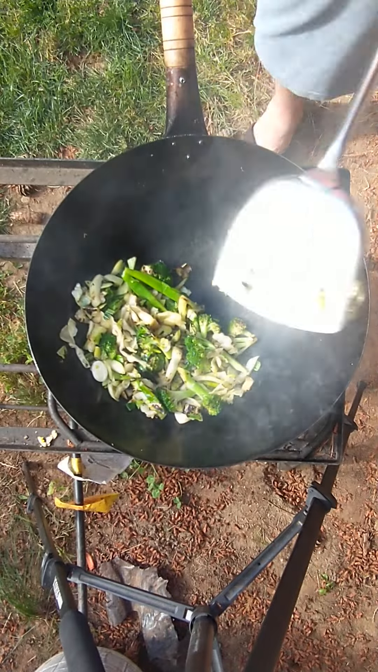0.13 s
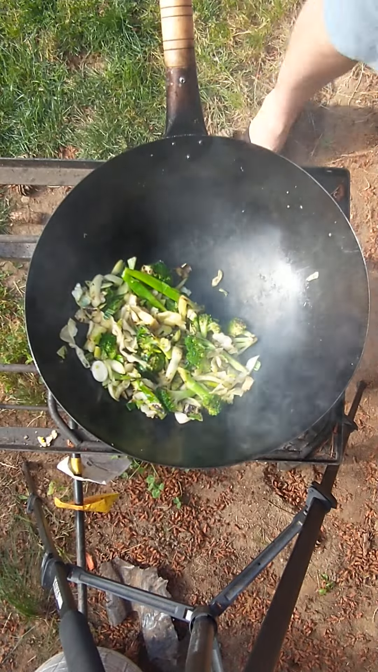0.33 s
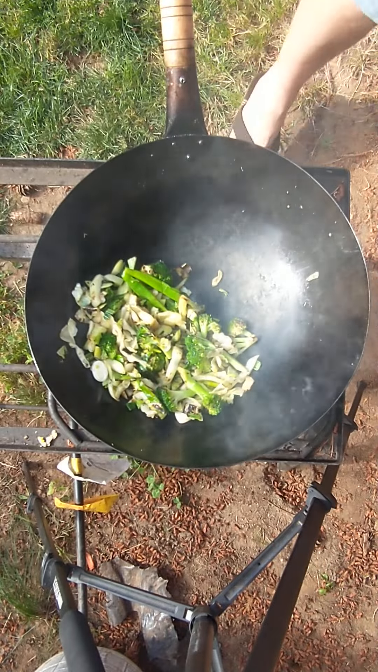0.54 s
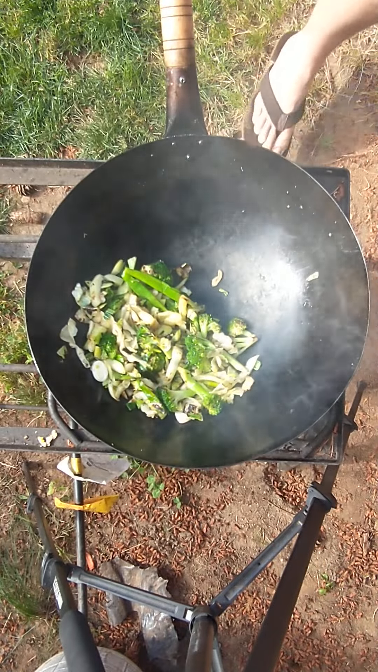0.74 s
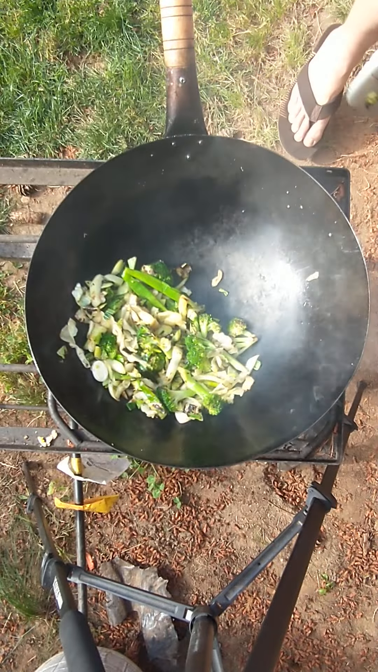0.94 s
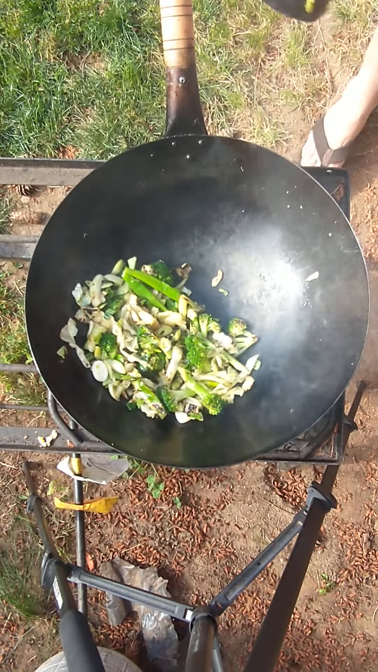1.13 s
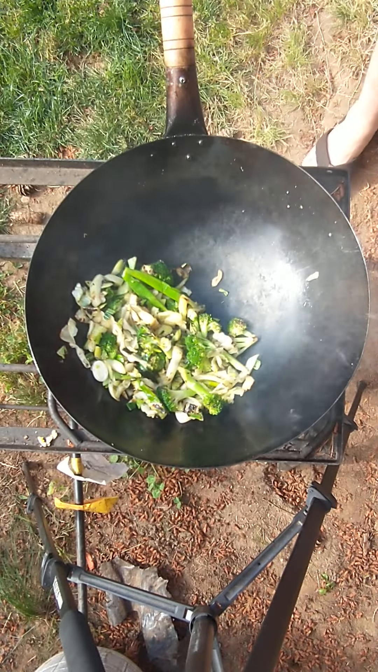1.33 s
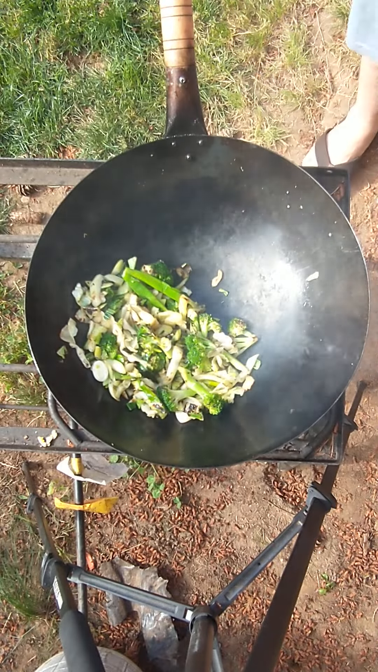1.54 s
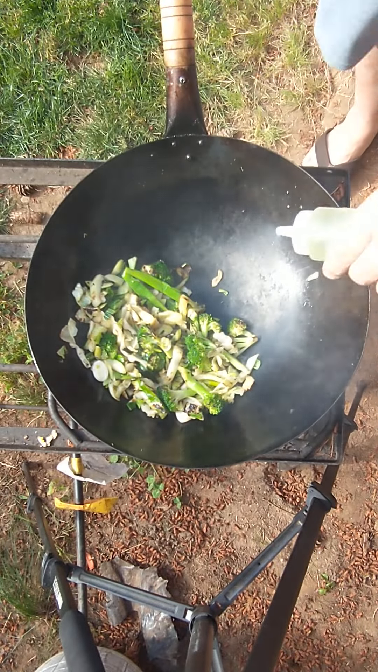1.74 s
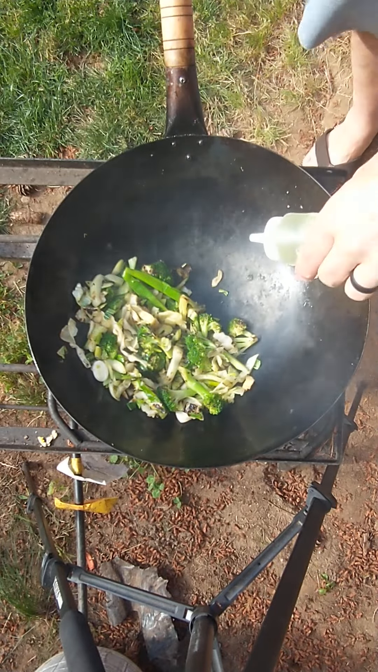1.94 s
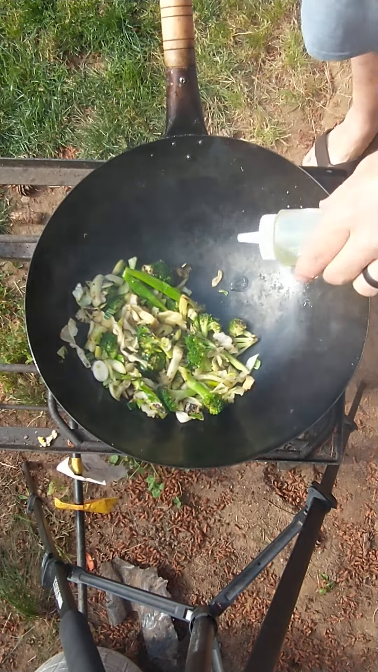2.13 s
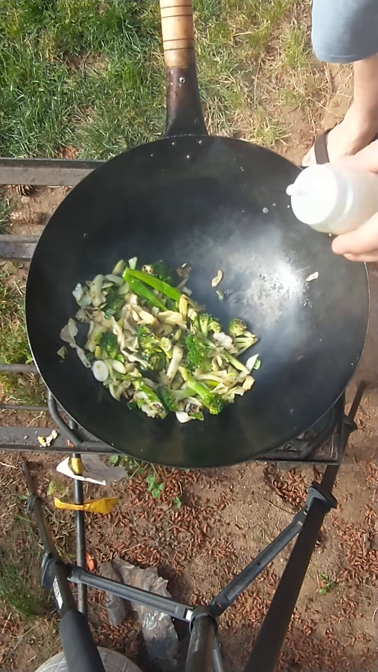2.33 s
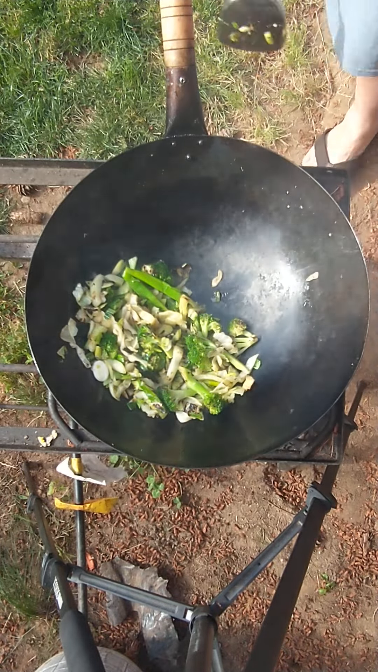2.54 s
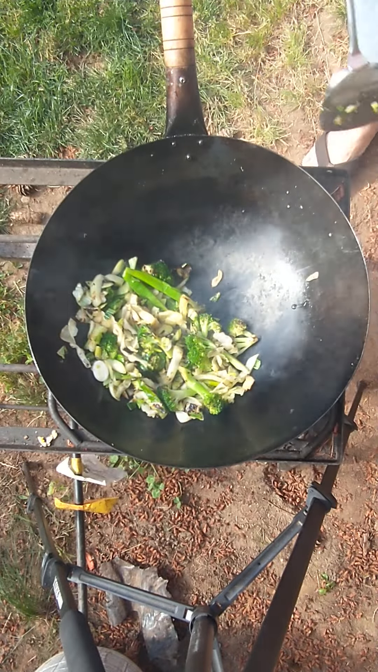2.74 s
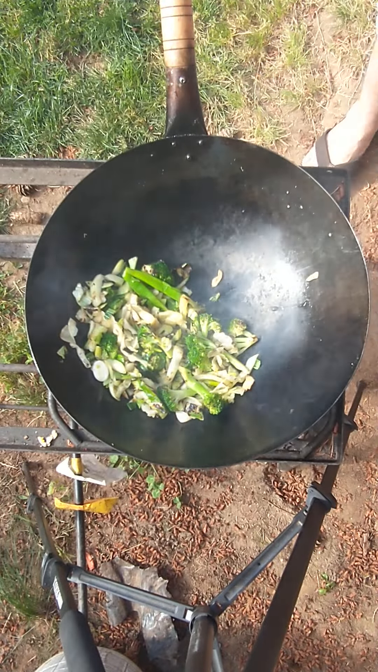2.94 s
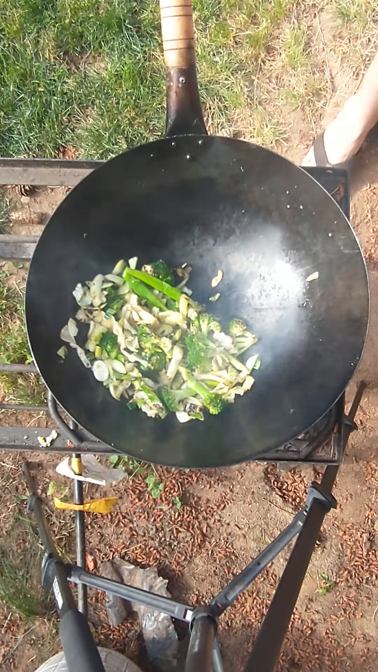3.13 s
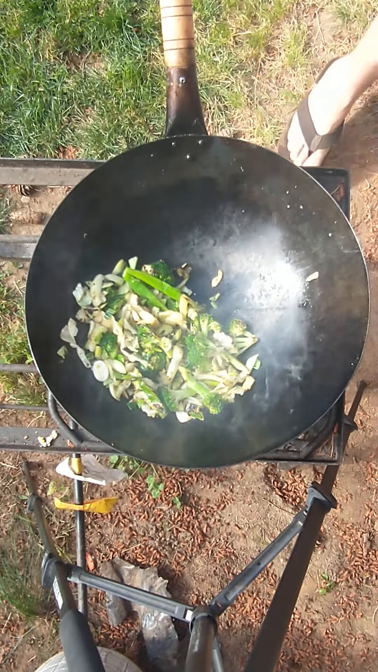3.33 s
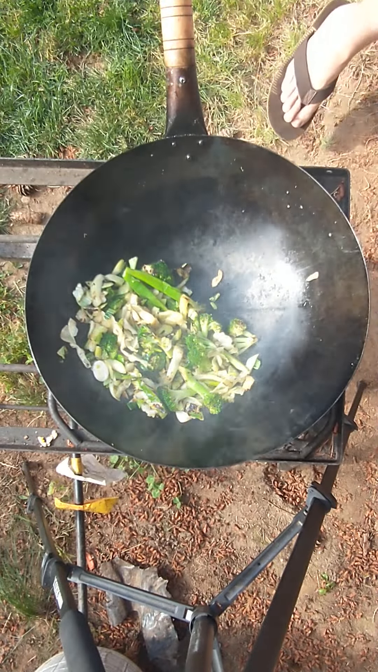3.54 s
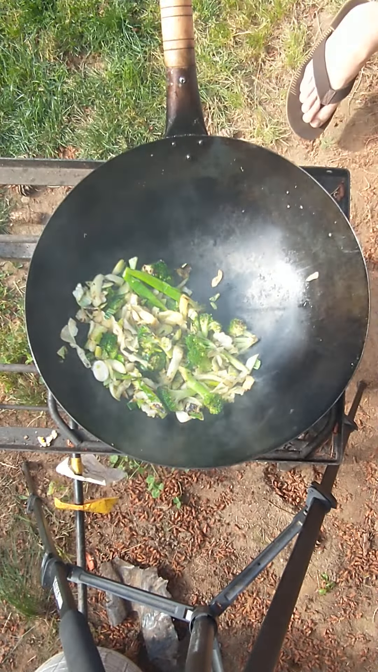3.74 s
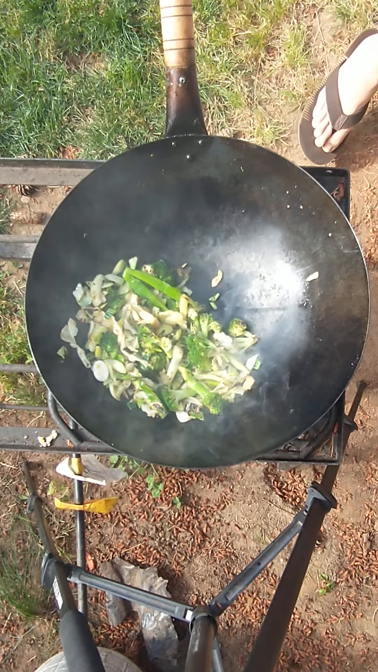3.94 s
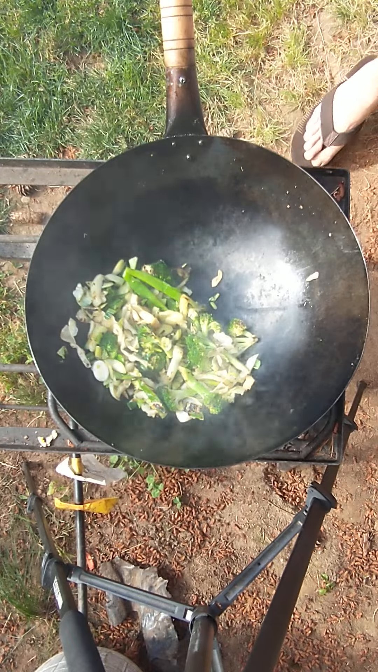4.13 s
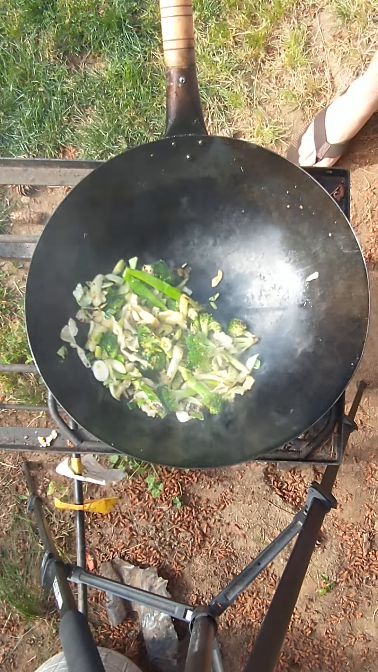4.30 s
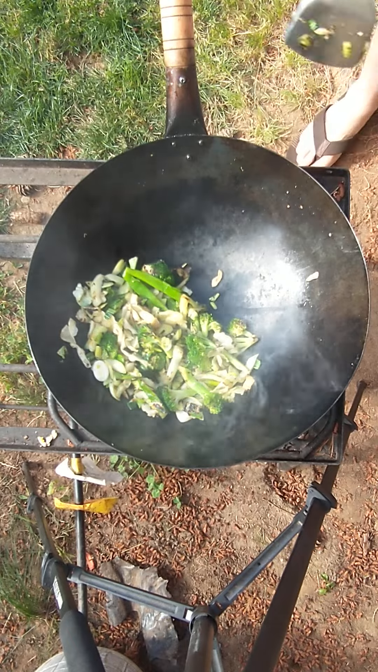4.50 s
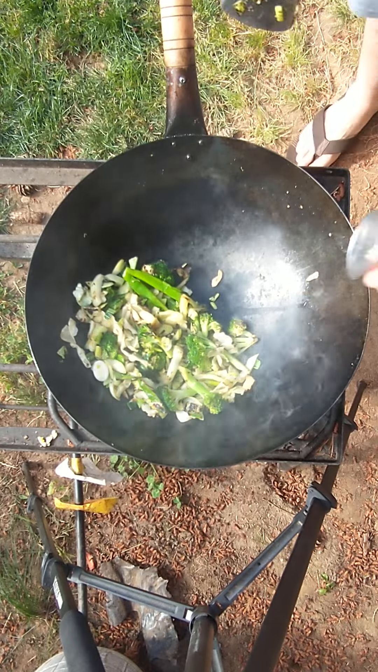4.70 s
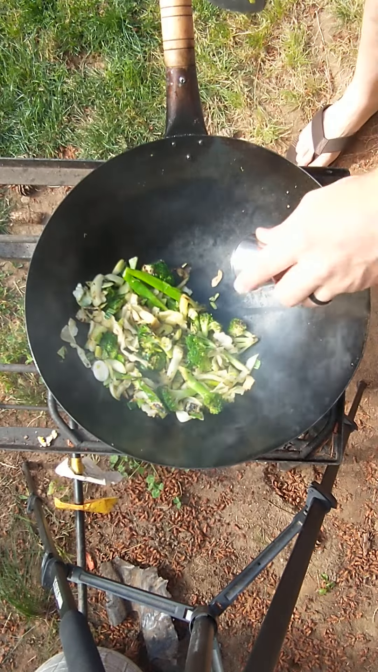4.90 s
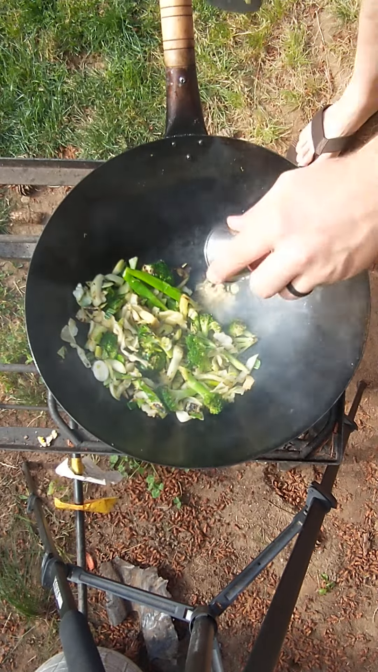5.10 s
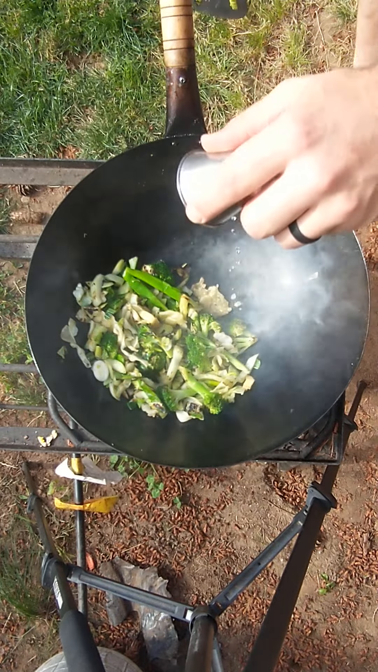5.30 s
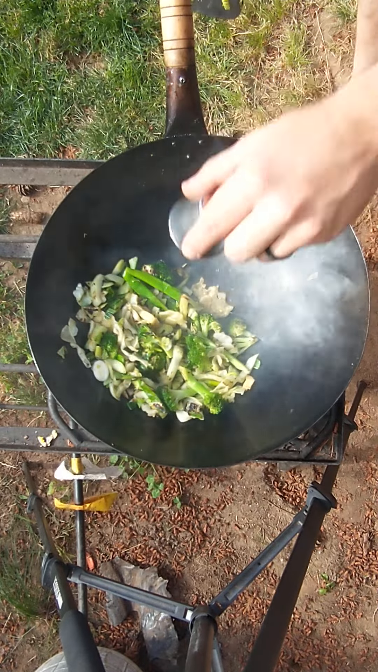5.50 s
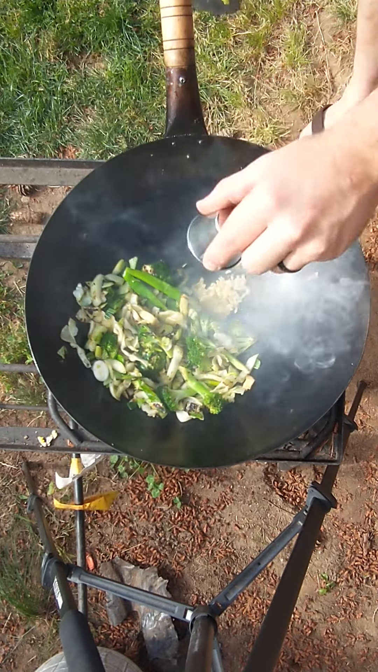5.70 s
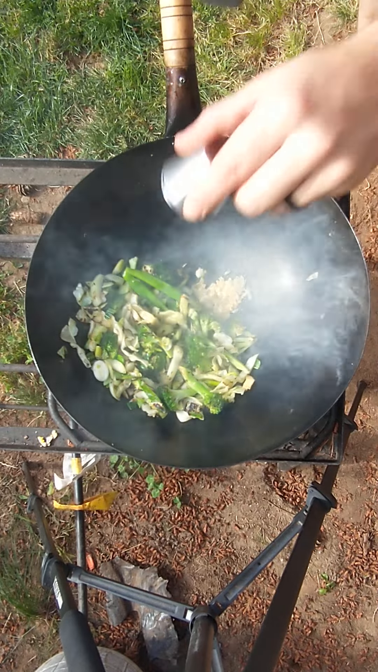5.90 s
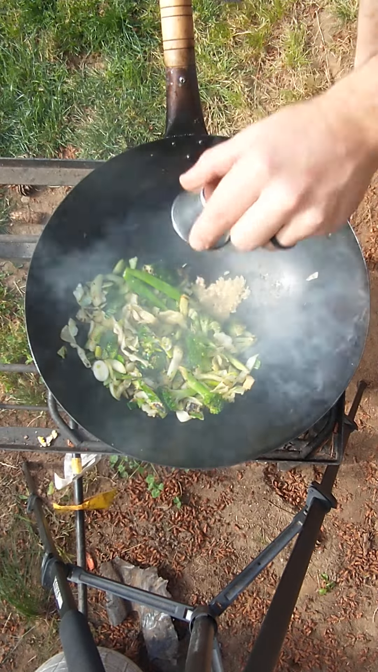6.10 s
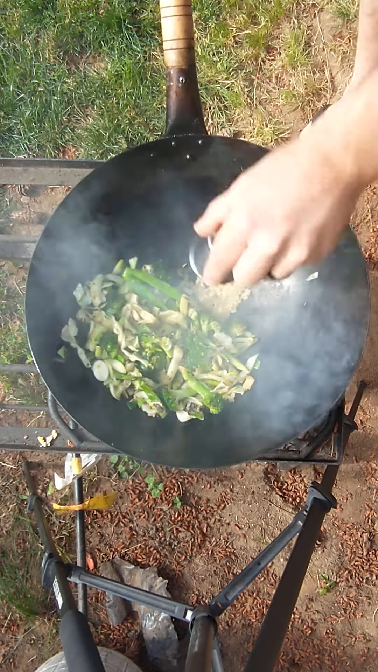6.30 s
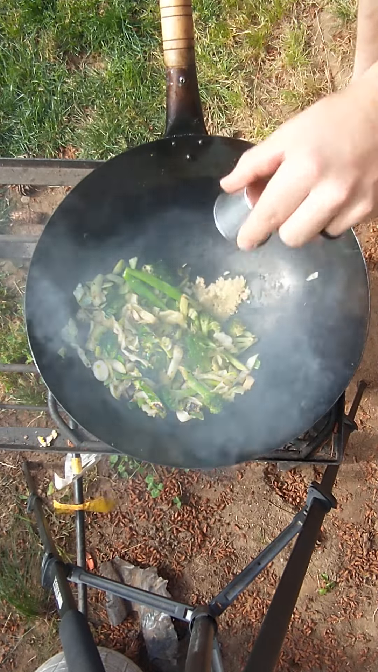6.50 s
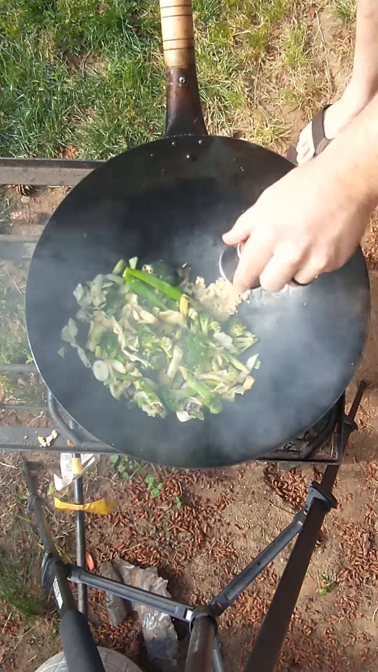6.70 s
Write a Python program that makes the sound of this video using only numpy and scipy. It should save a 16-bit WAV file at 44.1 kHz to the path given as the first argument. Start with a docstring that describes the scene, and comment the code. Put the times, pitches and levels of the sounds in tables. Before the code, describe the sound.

Greens sizzle and spit in a hot outdoor wok, thinning to a sparse sputter before minced garlic hits the oil with a loud dense hiss.

```python
"""Greens and garlic in a wok

Greens and mushrooms sizzle, spit and dry down in a wok outdoors, heard from just above the pan.
Then minced garlic drops into the hot oil and swells to a loud, dense hiss. Both are many tiny bubble bursts.
Juice fizzes in decaying bursts; spits and ticks are short cracks with a lower ring or knock behind.
A sandal on dirt (thud and grit), a faint hollow rubbing and a burner's rumble are mostly shaped noise."""
import sys
import numpy as np
from scipy import signal
from scipy.fft import rfft, irfft, next_fast_len
from scipy.io import wavfile

SR = 44100
rng = np.random.default_rng(int(sys.argv[2]) if len(sys.argv) > 2 else 0)


def file_out(sig):
    """Save sig as 16-bit WAV at sys.argv[1]."""
    # one column per channel
    cols = np.atleast_2d(sig).T
    # limit, then scale
    lim = np.clip(cols, -1, 1)
    pcm = np.round(lim * 32767).astype(np.int16)
    wavfile.write(sys.argv[1], SR, pcm)


N = 297675
TIME = np.arange(N) / SR  # seconds

# Every colour table gives only the shape of a tone; its overall level is set elsewhere.
# How hard the vegetables sizzle, before thinning and sputter: [t/s, level/dB]
GREENS_LEVEL = [(0.0, -37.5), (0.75, -37.5), (1.2, -39), (1.46, -38), (2.12, -42), (2.25, -39.5),
                (2.37, -41.5), (2.5, -39), (2.66, -41.5), (2.79, -45.5), (2.99, -46.5), (3.12, -46),
                (3.5, -47), (3.82, -51), (4.03, -48.5), (4.48, -50), (4.8, -47), (5.05, -46)]
# Colour of the vegetables while juicy: [f/Hz, level/dB]
JUICY_COLOUR = [(300, -28.5), (1200, -45), (1780, -24.5), (2000, -7), (2600, -5), (3950, 1), (4350, -3),
                (5500, -7), (6750, -2.5), (7700, -1.9), (9500, -2.5), (11000, -7.5), (13700, -10.5),
                (15300, -8)]
# Colour of the vegetables once drier: [f/Hz, level/dB]
DRIER_COLOUR = [(300, -39), (1200, -26.5), (1780, -28), (2000, -10), (2600, -8), (3950, -4), (4350, -8),
                (5500, -11.5), (6750, -3.5), (7700, -4.5), (9500, -6), (11000, -11.5), (13700, -15),
                (15300, -15)]
# Colour of the oil crackle: [f/Hz, level/dB]
CRACKLE_COLOUR = [(1500, -44), (4000, -14), (7000, -4), (10500, -3), (15500, -7)]
# Colour of the garlic: [f/Hz, level/dB]
GARLIC_COLOUR = [(100, -33.5), (450, -27.5), (1000, -18), (1550, -9.5), (2300, -12.5), (3150, -8.5),
                 (3500, -14), (4050, -6.5), (5100, -8.5), (6800, 0), (7600, -4.5), (9700, -3.5),
                 (10800, -10.5), (11900, -7.5), (13900, -11), (15500, -7.5)]
# The hiss surges as more wet garlic reaches the oil: [t/s, hold from t/s, gain/dB]
SURGES = [(5.272, 0.028, 0.5), (5.485, 0.15, 2), (5.768, .04, 4.5), (5.933, 0.18, 3.5), (6.14, 0.27, 3)]
# Juice flashes off hot metal: [t/s, starting level/dB, centre f/Hz, width/octaves, time to fall 60 dB/s]
FLARES = [(2.402, -36.5, 6200, 0.62, 0.1), (2.403, -44.5, 3840, 0.21, 1), (3.93, -53.5, 9000, 0.71, 0.44),
          (4.285, -51, 7840, 0.31, .4), (4.575, -40.5, 7950, 0.24, 0.15), (5.067, -34, 7750, 0.91, .1)]
# Loudest single spits and ticks: [t/s, crack level/dB, ring re crack/dB, low knock re crack/dB]
SPITS_AND_TICKS = [(0.101, -30, -5, -26), (0.402, -35.5, -13, -34), (0.584, -34, -14, -34),
                   (1.9982, -32.5, -11, -50), (2.5052, -36, -22, -38), (2.739, -34.5, -12, -33),
                   (2.8771, -37.5, -3.5, -14), (3.1592, -43, -10.5, -10), (3.3637, -44, -8.5, -3),
                   (3.4547, -39, -12, -14.5), (5.211, -29.5, -19, -34), (5.298, -23.5, -14, -39),
                   (5.308, -27, -20, -32)]
# Sandal on dirt: [t/s, level/dB, rise/s, time until it fades/s, time to fall 60 dB/s]
STEPS = [(0.0, -61, 0.0092, 0.12, .2), (2.919, -62, .002, 0.0065, 0.042), (3.423, -45, 0.0015, 0.035, 0.18),
         (4.840, -61.5, 0.051, 0.094, .2)]
# Colour of a step: [f/Hz, level/dB]
STEP_COLOUR = [(40, -24), (90, -3), (145, 6.5), (230, -7), (420, 1.5), (720, -4), (1000, -8), (1400, -4.5),
               (2700, -14.5), (4500, -21), (9000, -52)]
# Strength of the hollow rubbing: [t/s, level/dB]
RUB_LEVEL = [(3.98, -88), (4.06, -72), (4.12, -62), (4.15, -63), (4.19, -77.5), (4.29, -66), (4.40, -73),
             (4.48, -82)]
# Resonances of the rubbing: [f/Hz, width/Hz, level/dB]
RUB_MODES = [(300, 38, -5), (554, 58, -0.5), (707, 63, -4), (820, 60, -6)]
# Colour of the burner's low rumble: [f/Hz, level/dB]
BURNER_COLOUR = [(15, -65), (25, -43), (43, -15), (70, -7), (90, -3.5), (102, 3.5), (136, -7), (253, -9.5),
                 (295, -9.5), (368, -12), (408, -13.5), (460, -10), (718, -12.5), (1290, -15), (1500, -11),
                 (1950, -13.5), (3300, -120)]
# Strength of the rumble before its fixed boost: [t/s, level/dB]
BURNER_LEVEL = [(0.0, -61), (0.3, -65), (0.85, -61.5), (1.7, -66.5), (4.7, -68.5), (5.55, -61), (6.75, -64)]
# Left microphone port against the right: [f/Hz, level difference/dB]
PORT_BALANCE = [(200, -0.7), (1600, -2.5), (2600, 7.1), (3300, 4.3), (4000, 3.2), (4600, -4.2),
                (5200, -8.7), (6000, -1.5), (6800, 3.4), (7700, 1), (10200, -1.4), (10800, -8.0),
                (13600, -8.2), (14700, -2.5)]
# How alike the two ports are: [f/Hz, likeness from 0 to 1]
PORT_LIKENESS = [(200, 1), (1900, 0.87), (2650, 0.24), (3500, 0.35), (4300, 0.2), (5500, 0.27),
                 (7000, 0.39), (9500, 0.11), (15000, 0.19)]


def greens(drier_s=1.73, change_s=0.2, thinning=0.52):
    """Juice boils off under the vegetables; sparse, sharp oil crackles stand out as the boil fades."""
    s, db = np.transpose(GREENS_LEVEL)
    level_db = np.interp(TIME, s, db)
    sunk_db = db.max() - level_db
    activity = gain_of(-thinning * sunk_db)  # a quieter pan has fewer bubbles
    boil = bubbles(per_s=11000 * activity, spread_db=3.0, largest=4.9, flutter_db=0.65)
    dryness = np.clip((TIME - drier_s) / change_s + 0.5, 0, 1)
    juicy_boil = (1 - dryness) * coloured(boil, JUICY_COLOUR)
    drier_boil = dryness * coloured(boil, DRIER_COLOUR)

    crackle = bubbles(per_s=100, spread_db=3.5, largest=3.2, flutter_db=1.2)
    crackle_gain = gain_of(-14 + 0.11 * sunk_db)
    sizzle = juicy_boil + drier_boil + crackle_gain * coloured(crackle, CRACKLE_COLOUR)

    # the thinner the sizzle, the more it sputters
    sputter_db = 0.47 + 0.032 * sunk_db
    middle_db = level_db + sputter_db * flutter(3.3, 15)
    large_db = middle_db - 9 - 0.031 * sunk_db
    fine_db = middle_db - 8 + 0.33 * sunk_db
    return played(sizzle, [large_db, middle_db, fine_db], edges_hz=(5700, 10800))


def garlic(lands_s=5.066, heats_s=5.135, hot_s=5.267, landing_db=-39, hot_db=-28.5):
    """Wet garlic meets hot oil: dense bubbles merge into a hiss, and grow larger as it cooks."""
    hiss = bubbles(per_s=30000, spread_db=2.9, largest=5.5, flutter_db=0.3)
    hiss = coloured(hiss, GARLIC_COLOUR)
    heat_db = np.interp(TIME, [heats_s, hot_s], [landing_db, hot_db])
    surge_db = surges()
    cooked_s = TIME - lands_s
    # each size: level against the main hiss (dB), growth (dB per s), share of each surge
    large_db = heat_db - 17 + 4.9 * cooked_s + 0.29 * surge_db
    middle_db = heat_db - 8.5 + 1.64 * cooked_s + 0.59 * surge_db
    main_db = heat_db + surge_db
    fine_db = heat_db - 3 + 0.32 * cooked_s + 0.47 * surge_db
    levels_db = [large_db, middle_db, main_db, fine_db]
    return played(hiss, levels_db, edges_hz=(3600, 5700, 10800)) * (TIME > lands_s)


def surges(rise_s=0.015, fall_s=0.038):
    """More wet garlic lifts the hiss: each surge rises quickly, holds and falls back, in dB."""
    lifts = []
    for s, hold_s, db in SURGES:
        rise = np.clip((TIME - s) / rise_s, 0, 1)
        fall = np.exp(-np.maximum(TIME - s - hold_s, 0) / fall_s)
        lifts.append(db * rise * fall)
    return np.max(lifts, axis=0)


def flares():
    """A trickle of juice flashes to steam: a sudden fizz that dies away."""
    hz, out = bins(), np.zeros((2, N))
    fizz = bubbles(per_s=8000, spread_db=2.5, largest=4, flutter_db=0.5, count=4)
    for s, db, centre_hz, octaves, t60 in FLARES:
        distance = np.log2((hz + 1) / centre_hz) / octaves
        tone = irfft(causal(np.maximum(-4 * distance ** 2, -60)))
        piece = fizz[:, round(s * SR):][:, :SR // 2]
        burst = evened(signal.oaconvolve(piece, tone[None], axes=1))
        t = np.arange(burst.shape[1]) / SR
        add(out, s, burst * gain_of(db - 60 * t / t60))
    return out


def spits_and_ticks(lag_s=0.00113, lag_hz=5500):
    """A drop bursts in the oil or a sandal ticks on grit: a sharp crack, a lower ring or knock just behind."""
    hz, out = bins(), np.zeros((2, N))
    crack = gain_of(read([(1500, -74), (4500, -31), (6800, 3.5), (9500, -6), (15500, -31)], hz))
    ring = gain_of(read([(1200, -33.0), (2100, -2.0), (3900, 5), (5800, -4), (9000, 0)], hz))
    knock = gain_of(read([(100, -18), (500, -0.5), (1500, -3), (2500, 3), (6000, -37)], hz))
    # tones below lag_hz arrive later
    delay_s = lag_s / (1 + (hz / lag_hz) ** 4)
    late = np.exp(-2j * np.pi * np.cumsum(delay_s) * hz[1])
    paths = bowl(len(SPITS_AND_TICKS), scatter_s=0.0004, echo_db=-27)
    for (s, crack_db, ring_db, knock_db), (near, other) in zip(SPITS_AND_TICKS, paths):
        whole = crack + gain_of(ring_db) * ring + gain_of(knock_db) * knock
        tone = late * causal(20 * np.log10(whole))
        pop = ports(near * tone, other * tone)
        # the crack's level is its average strength (rms) over 4 ms
        crack_only = ports(near * crack, other * crack).mean(0)
        crack_rms = np.sqrt(np.sum(crack_only ** 2) / (0.004 * SR))
        add(out, s, pop / crack_rms * gain_of(crack_db))
    return out


def footsteps(grit_db=-7, heel_db=8, heel_hz=170, heel_s=0.003):
    """A sandal lands on dirt: the heel thuds, and grit crunches while the weight comes on."""
    weight, heel = np.zeros((2, 1, N))
    t = np.arange(SR // 2) / SR
    for s, db, rise_s, load_s, t60 in STEPS:
        fade_db = 60 * np.maximum(t - load_s, 0) / t60
        press = np.clip(t / rise_s, 0, 1) * gain_of(db - fade_db)
        thud = press * np.exp(-t / heel_s) * np.sin(2 * np.pi * heel_hz * t)
        add(weight, s, press[None])
        add(heel, s, thud[None])
    # the grit grains are random clicks, made the same way as bubbles
    grains = bubbles(per_s=2500, spread_db=2.5, largest=3, flutter_db=0.4, count=2)
    grit = coloured(grains, [(500, -20), (2000, -8), (6000, -6), (10000, 2), (15000, -1)])
    return weight * (rush(STEP_COLOUR) + gain_of(grit_db) * grit) + gain_of(heel_db) * heel


def rub():
    """A faint hollow rubbing: noise in a few low resonances."""
    hz = np.geomspace(100, 4000, 400)
    gain = sum(gain_of(db) / (1 + (2 * (hz - f) / width) ** 2) for f, width, db in RUB_MODES)
    colour = np.transpose([hz, 20 * np.log10(gain)])
    s, db = np.transpose(RUB_LEVEL)
    return rush(colour) * gain_of(np.interp(TIME, s, db, -120, -120))


def burner(boost_db=3):
    """The flame rumbles softly under the wok: low noise with a slowly changing level."""
    s, db = np.transpose(BURNER_LEVEL)
    return rush(BURNER_COLOUR) * gain_of(np.interp(TIME, s, db) + boost_db)


def bubbles(per_s, spread_db, largest, flutter_db, count=10):
    """Steam bubbles burst in clumps at many spots of the pan: most tiny, a few large."""
    size = gain_of(spread_db * np.minimum(rng.exponential(1, N), largest))
    bursts = size * rng.choice([-1., 1.], N) * (rng.random(N) < per_s / SR)
    spot, out = rng.integers(0, count, N), np.zeros((2, N))
    for k, (near, other) in enumerate(bowl(count, scatter_s=0.00045, echo_db=-23)):
        here = (bursts * (spot == k))[None]
        out += signal.oaconvolve(here, ports(near, other), axes=1)[:, :N]
    return out * gain_of(flutter_db * flutter(7, 90))


def played(sound, levels_db, edges_hz):
    """Bubbles of each size, from large and low to fine and high, follow their own level."""
    size = next_fast_len(N)
    hz, spectrum = np.fft.rfftfreq(size, 1 / SR), rfft(sound, size)
    below = [0] + [1 / (1 + (hz / edge) ** 24) for edge in edges_hz] + [1]
    out = np.zeros((2, N))
    for under, over, db in zip(below, below[1:], levels_db):
        band = irfft(spectrum * (over - under), size)[:, :N]
        out += evened(band) * gain_of(db)
    return out


def bowl(count, scatter_s, echo_db):
    """Sound from spots in the wok scatters quickly off its wall, then echoes faintly from the ground."""
    t = np.arange(2 * len(bins()) - 2) / SR
    shape = np.exp(-t / scatter_s) + gain_of(echo_db) * np.exp(-t / 0.0092)
    paths = rfft(rng.standard_normal((count, 2, len(t))) * shape)
    return paths / np.sqrt(np.mean(abs(paths) ** 2, axis=0))


def ports(near, other, lag_s=0.000281, split_hz=2300):
    """Two unrelated responses become a partly alike pair; treble reaches the right port first."""
    hz = bins()
    same = np.clip(read(PORT_LIKENESS, hz), 0, 1)
    half_db = read(PORT_BALANCE, hz) / 2
    lead = np.exp(2j * np.pi * np.maximum(hz - split_hz, 0) * lag_s)
    left = near * gain_of(half_db)
    mixed = same * near + np.sqrt(1 - same ** 2) * other
    right = mixed * lead * gain_of(-half_db)
    return np.roll(irfft([left, right]), 32, axis=1)  # 32 samples leave room for the lead


def rush(colour, apart=0.47, alike_hz=190):
    """Rushing noise of one colour, nearly alike at both ports and most alike in the bass."""
    common, side = rng.standard_normal((2, N))
    side = signal.lfilter(*signal.butter(1, alike_hz, "high", fs=SR), side)
    pair = np.array([common + apart * side, common - apart * side])
    return coloured(pair, colour, size=8192)


def flutter(low_hz, high_hz, count=40):
    """An uneven wander of average strength (rms) 1: many slow waves, each starting at random."""
    t = TIME[::64]
    rates = np.geomspace(low_hz, high_hz, count)[:, None]
    wave = np.sin(2 * np.pi * (rates * t + rng.random((count, 1)))).sum(0)
    return np.interp(TIME, t, wave / wave.std())


def coloured(sound, colour, size=2048):
    """Filters a stereo pair by a colour table, then evens its level."""
    tone = irfft(causal(read(colour, bins(size=size))))
    return evened(signal.oaconvolve(sound, tone[None], axes=1)[:, :N])


def causal(db):
    """A filter with the given gain that responds as early as it can (minimum phase)."""
    log_gain = np.log(gain_of(np.concatenate([db, db[-2:0:-1]])))
    return np.exp(np.conj(signal.hilbert(log_gain)))[:len(db)]


def bins(size=2048):
    """Frequencies of the short responses, in Hz."""
    return np.fft.rfftfreq(size, 1 / SR)


def read(points, hz):
    """A table's value on a log-frequency axis."""
    f, value = np.transpose(points)
    return np.interp(np.log(hz + 1), np.log(f + 1), value)


def evened(x):
    """Scales a stereo pair so that its left-right average has rms 1."""
    return x / np.sqrt(np.mean(x.mean(0) ** 2) + 1e-20)


def gain_of(db):
    """Decibels to amplitude."""
    return 10 ** (np.asarray(db) / 20)


def add(mix, s, sound):
    """Adds a sound to the mix at time s, in place."""
    part = mix[:, max(round(s * SR), 0):][:, :sound.shape[1]]
    part += sound[:, :part.shape[1]]


def scene():
    """Everything around the wok, in the open air."""
    return greens() + garlic() + flares() + spits_and_ticks() + footsteps() + rub() + burner()


def record(dry, edge_hz=15900):
    """The recorder's band limit: it cuts the treble above the edge."""
    lowpass = signal.firwin(511, edge_hz, window=("kaiser", 9), fs=SR)
    return signal.oaconvolve(dry, lowpass[None], "same")


dry = scene()
out = record(dry)
file_out(out)
```